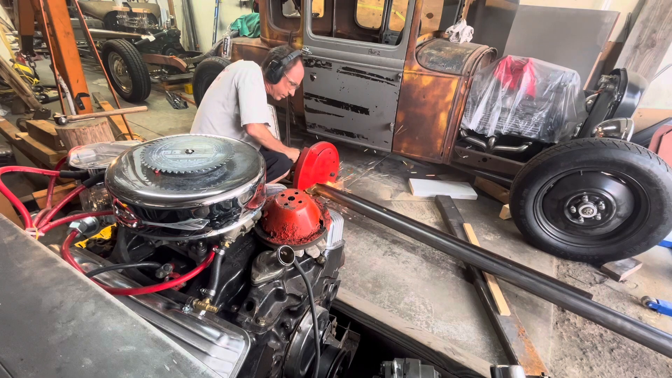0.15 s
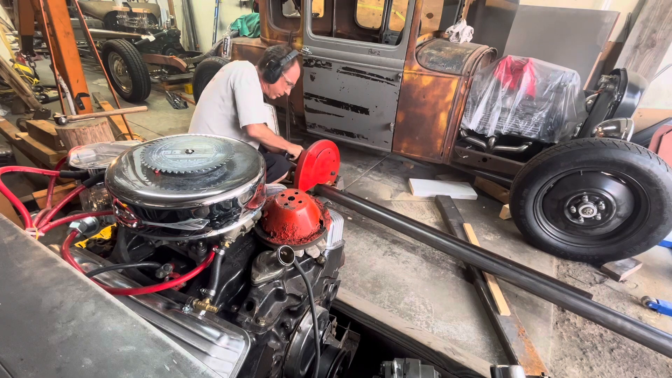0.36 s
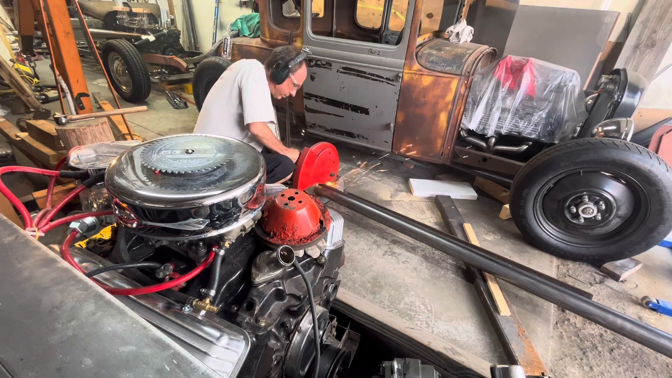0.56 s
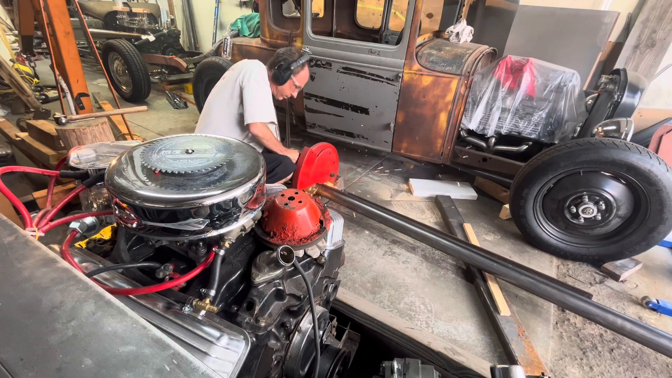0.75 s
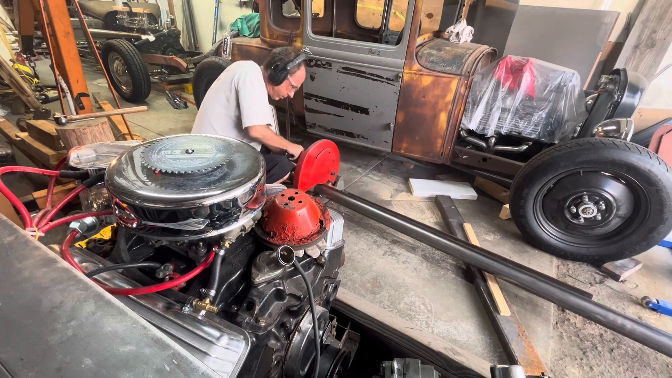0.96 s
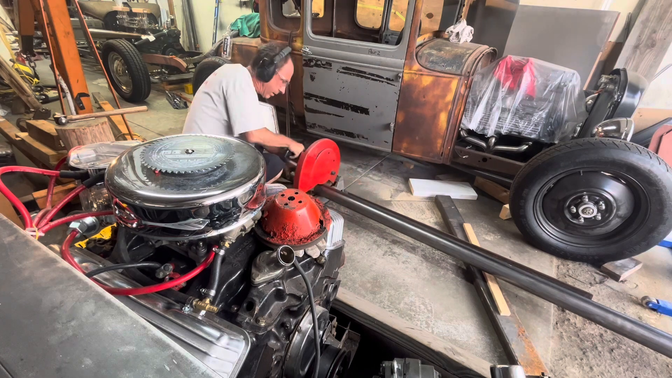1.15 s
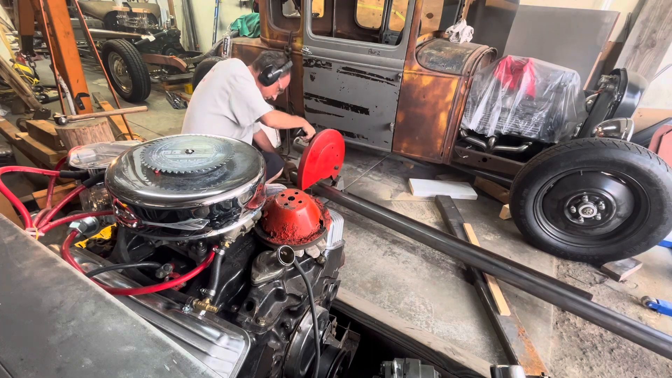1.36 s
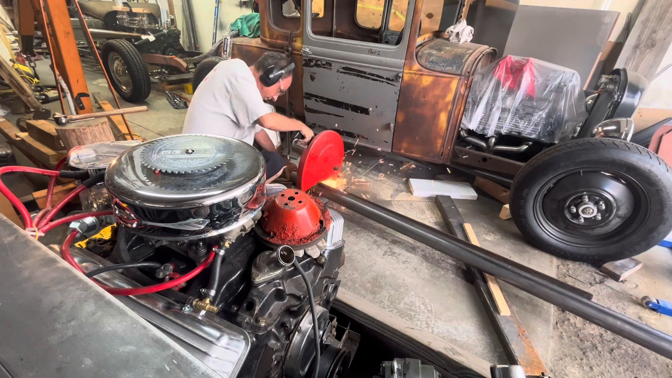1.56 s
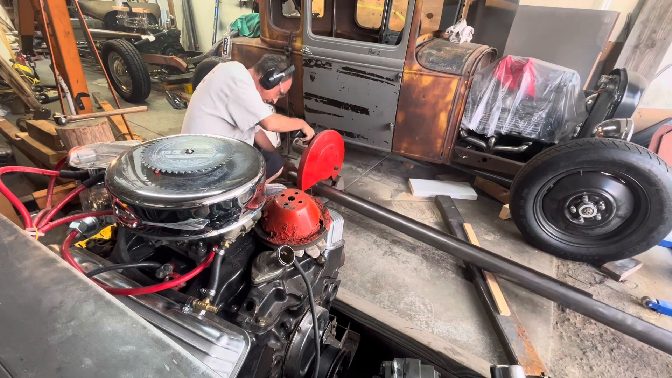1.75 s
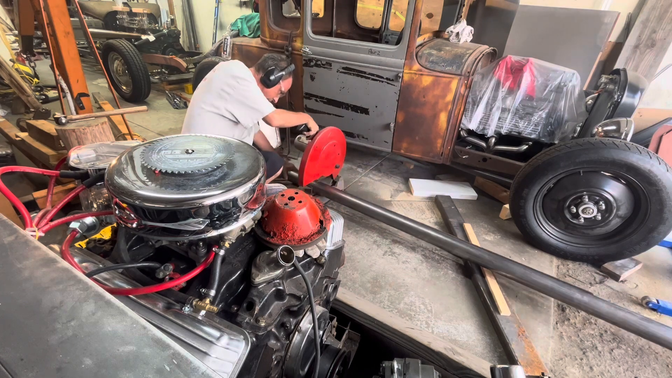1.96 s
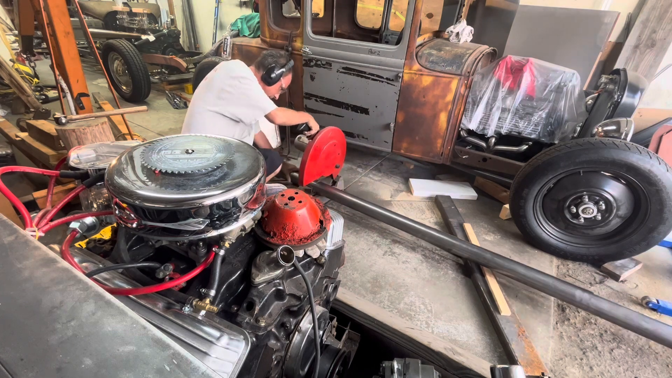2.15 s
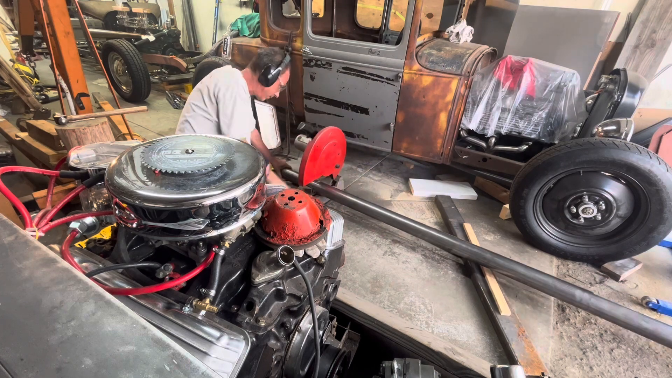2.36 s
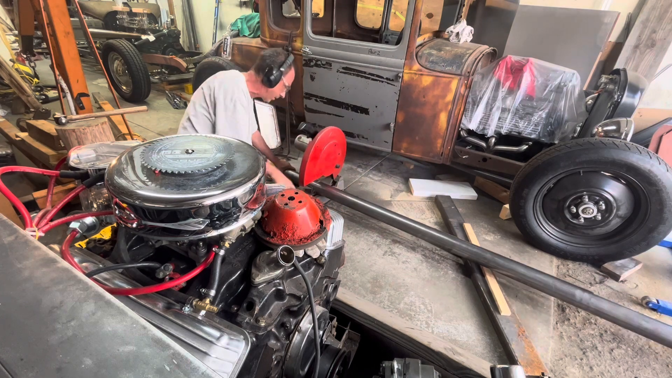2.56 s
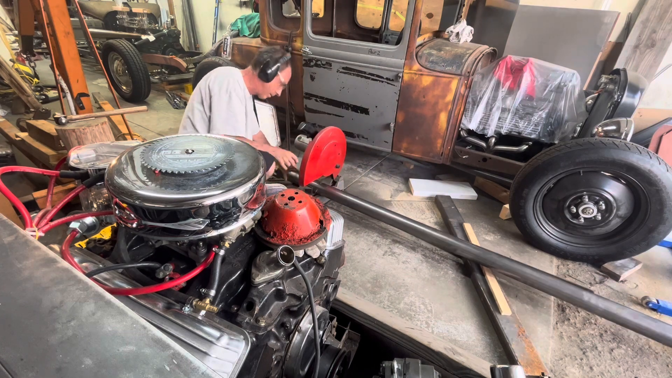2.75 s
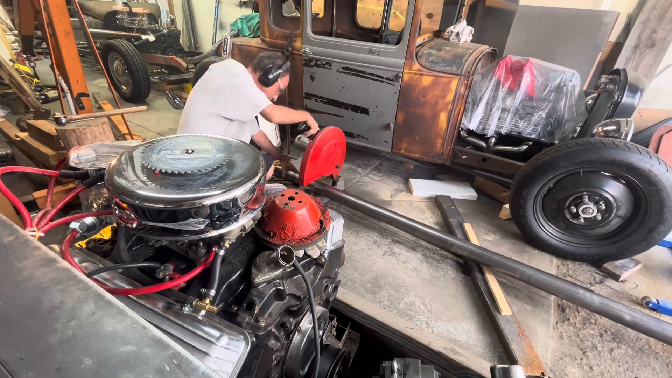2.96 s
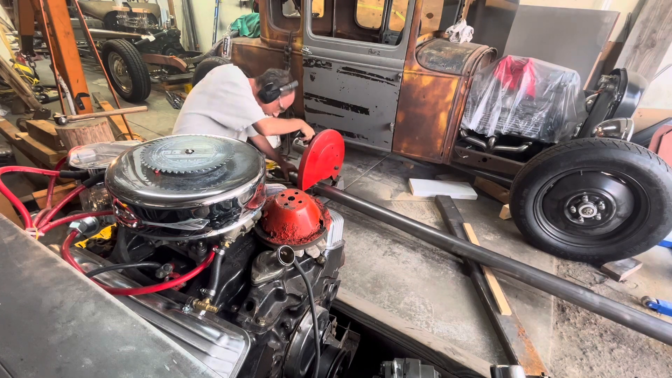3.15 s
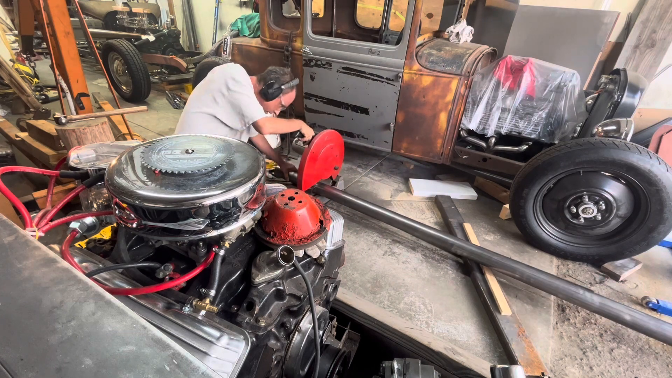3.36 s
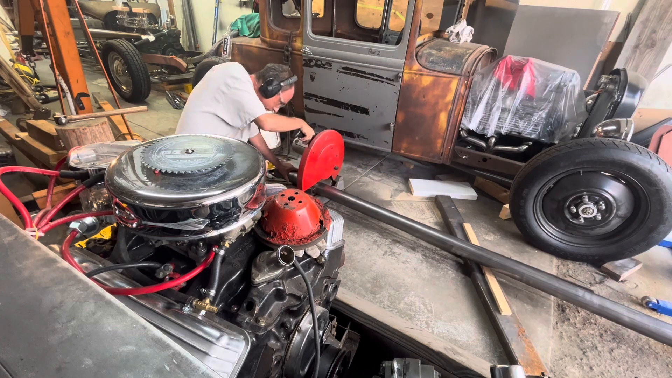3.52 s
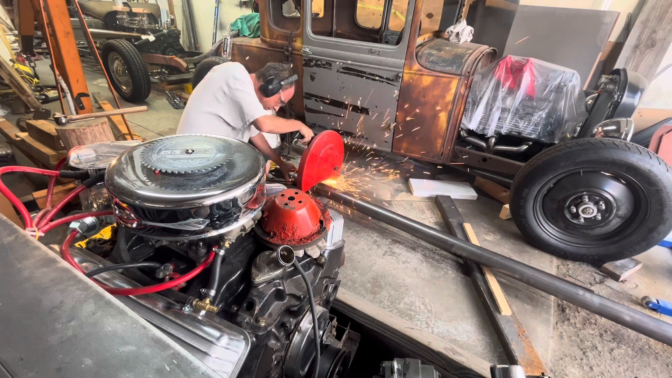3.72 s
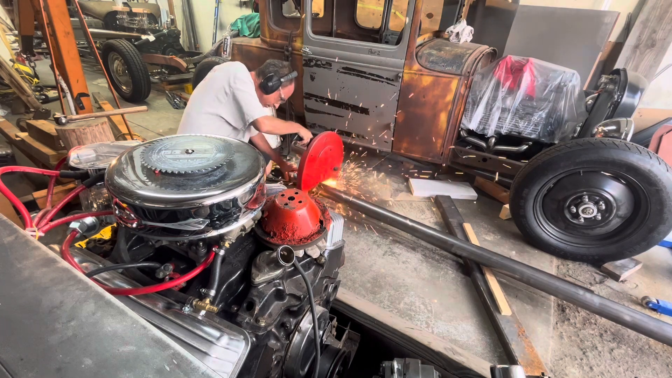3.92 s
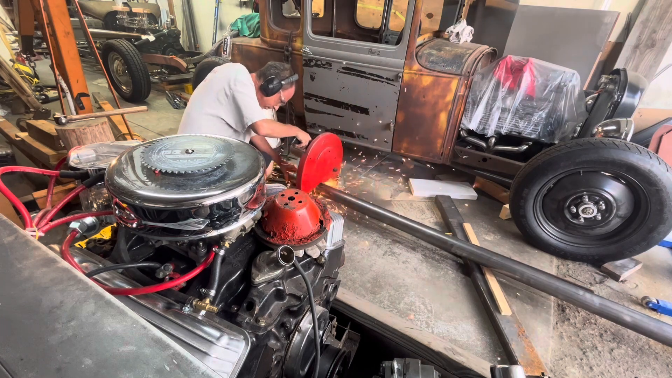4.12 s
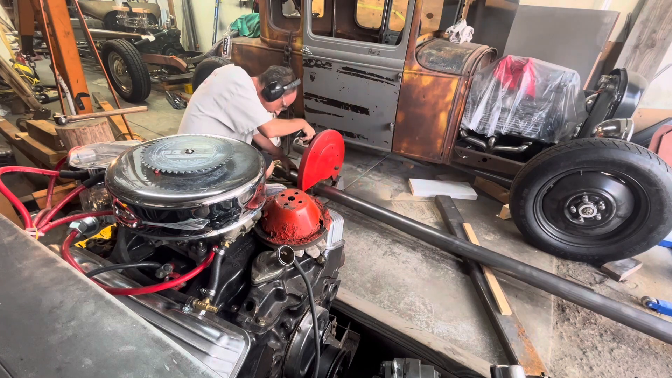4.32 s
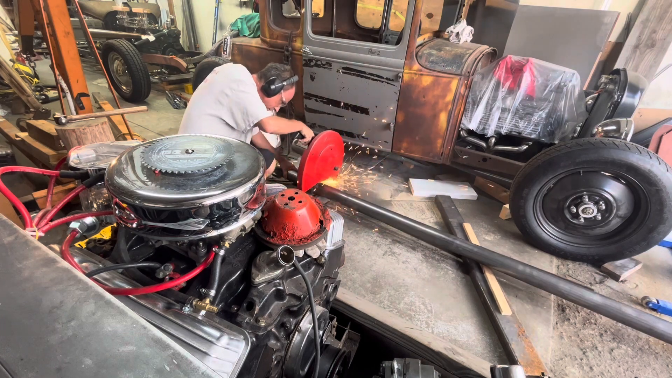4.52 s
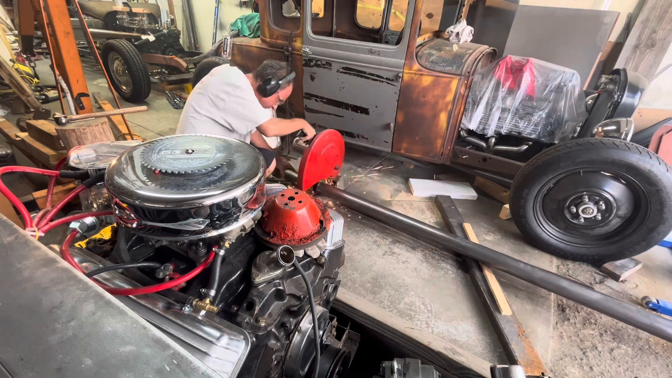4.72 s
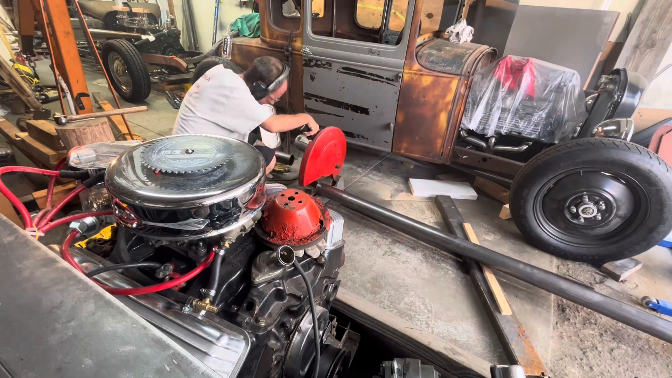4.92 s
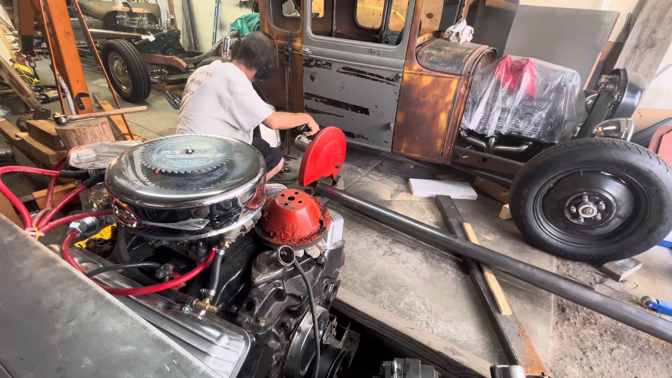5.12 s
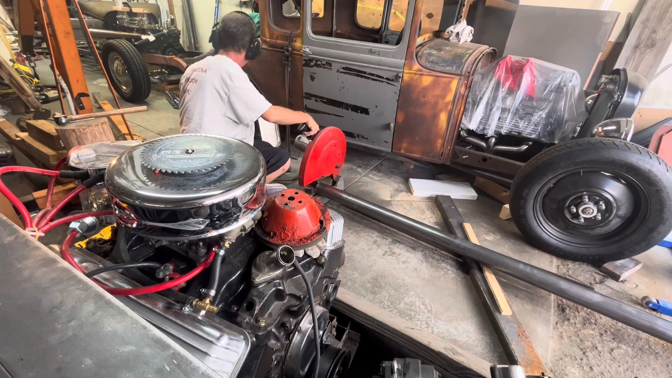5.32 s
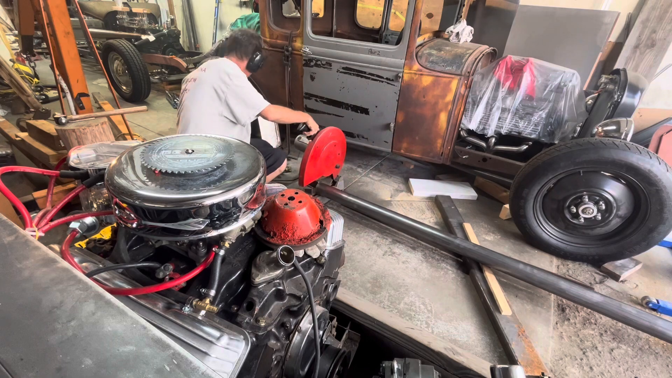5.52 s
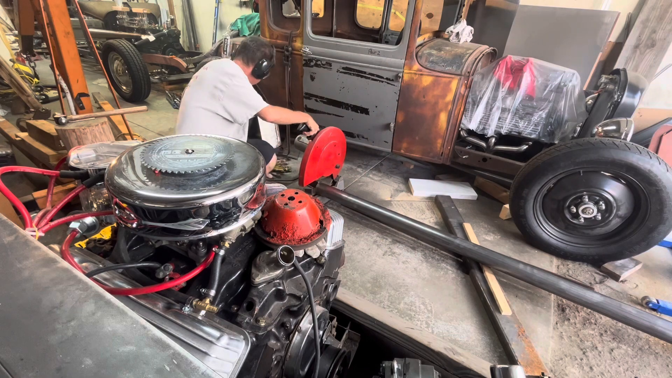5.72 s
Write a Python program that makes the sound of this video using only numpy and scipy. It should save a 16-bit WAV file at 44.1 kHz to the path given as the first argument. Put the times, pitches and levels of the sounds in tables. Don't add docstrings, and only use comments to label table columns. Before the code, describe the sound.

An abrasive chop saw works on a steel tube a few metres away in a cluttered garage, heard in stereo with a short room answer and soft air with a faint insect band. From 0 to 1.1 s gritty rasping, bright and uneven, shakes the saw's base, with the wheel singing near 4 kHz. The tube rings thinly, near 1.4 kHz, in the gap. Short bites come at 1.4 to 1.65 s, with a sharp burst around 1.83 s. The motor then coasts down to about 2.6 s, humming and fading. Quiet scuffs of hands and work follow from 2.7 to 3.55 s. At 3.6 s the wheel slams in, the loudest knock, bouncing into harsh grinding until 4.2 s. The motor whine falls briefly, another cut rasps from 4.48 to 4.77 s, and the motor winds down with a dropping whine. At 5.53 s a loose clamp clinks with a rustle and weak rebound.

```python
import sys
import numpy as np
from scipy import signal
from scipy.fft import rfft, irfft, next_fast_len
from scipy.io import wavfile
from scipy.ndimage import uniform_filter1d, map_coordinates

SR = 44100
rng = np.random.default_rng(int(sys.argv[2]) if len(sys.argv) > 2 else 0)


def voltage_ratio(decibels):
    exponent = np.asarray(decibels, float) / 20
    return 10 ** exponent


def transcribe(signal):
    frames = np.atleast_2d(signal).T
    limited = np.clip(frames, -1, 1)
    pcm = np.round(limited * 32767).astype(np.int16)
    wavfile.write(sys.argv[1], SR, pcm)


N = 254877


def along(points, hz):
    f, v = np.transpose(points)
    return np.interp(np.log(hz + 1), np.log(f + 1), v)


def curves(rows):
    return np.interp(np.arange(N) / SR, *np.transpose(rows))


def wobble(rate):
    coarse = np.arange(0, N + 32, 32)
    knots = rng.standard_normal(int(N * rate / SR) + 5)
    return np.interp(np.arange(N), coarse, map_coordinates(knots, [coarse * rate / SR]))


def strokes(s, length, first_db, last_db, rise, fall):
    coarse = np.arange(0, N + 32, 32)
    t = coarse / SR - np.asarray(s)[..., None]
    length = np.maximum(length, 1e-3)
    first_db, last_db, length = (np.asarray(v)[..., None] for v in (first_db, last_db, length))
    held = first_db + (last_db - first_db) * np.clip(t / length, 0, 1)
    db = held + rise * np.minimum(t, 0) - fall * np.maximum(t - length, 0)
    return np.interp(np.arange(N), coarse, voltage_ratio(np.atleast_2d(db).max(0)))


def filtered(x, response):
    m = next_fast_len(N + SR // 2)
    return irfft(rfft(x, m) * response(np.fft.rfftfreq(m, 1 / SR)), m)[..., :N]


def modes(table):
    def response(f):
        total = 0
        for k, (c, w, db) in enumerate(table):
            total = total + (-1) ** k * voltage_ratio(db) * 1j * f * w / (c * c - f * f + 1j * f * w)
        return total
    return response


def voiced(x, response, lo_hz, hi_hz):
    m = next_fast_len(N + SR // 4)
    hz = np.fft.rfftfreq(m, 1 / SR)
    z = rfft(x, m) * response(hz)
    band = (hz > lo_hz) & (hz < hi_hz)
    power = 2 * np.sum(abs(z.mean(0)[band]) ** 2) / (m * N)
    return irfft(z, m)[:, :N] / np.sqrt(power)


def grit(spiky_db, patchy_db, size=(5, 9)):
    # f/Hz, left-right correlation [-1..1]
    alike = [(30, 0.75), (100, 0.93), (200, 0.33), (500, -0.17), (1500, 0.024), (8000, 0.013),
             (13000, 0.27)]
    white = rng.standard_normal((2, N)) * voltage_ratio(spiky_db * rng.exponential(size=N))
    hz, _, z = signal.stft(white, SR, nperseg=512)
    field = uniform_filter1d(rng.standard_normal(z.shape[1:]), size[0], 0)
    field = uniform_filter1d(field, size[1], 1)
    turn = np.arccos(np.clip(along(alike, hz), -1, 1))[:, None] / 2
    mid, side = z[0] * np.cos(turn), z[1] * np.sin(turn)
    patches = voltage_ratio(patchy_db * field / field.std())
    return signal.istft(np.array([mid + side, mid - side]) * patches, nperseg=512)[1][:, :N]


def yard():
    # t/s, level/dB
    air_level = [
        (0, -66),
        (1.1, -64),
        (1.4, -68.5),
        (2.2, -69.5),
        (2.9, -64),
        (3.55, -61),
        (4.4, -76),
        (5.78, -67),
    ]
    # f/Hz, level/dB per Hz
    air_colour = [(15, -42.5), (25, -33), (119, -4.5), (188, -7.5), (349, -1), (614, -7), (1080, -14),
                  (1340, -11), (2920, -24.5), (5140, -14), (6920, -33), (12200, -38), (15500, -47.5)]
    air = voiced(grit(0, 2), lambda f: voltage_ratio(along(air_colour, f)), 25, 15500)
    return voltage_ratio(curves(air_level) + 1.2 * wobble(7)) * air


def hands():
    # t/s, peak level/dB, low part over it/dB, length/s
    scuffs = [(2.7204, -27.5, -19.5, 0.051), (2.758, -39, -36, 0.031), (2.856, -35, -12, 0.049),
              (2.941, -45, -6.5, 0.017), (3.043, -50.5, -3.5, 0.033), (3.089, -50, 0, 0.024),
              (3.2, -37, -13, 0.017), (3.296, -52.5, 1, 0.024), (3.4193, -25.5, -19, 0.026),
              (3.434, -43, -2.5, 0.064), (3.554, -28.5, -21, 0.0045), (5.027, -44.5, -8, 0.03),
              (5.39, -48, -12, 0.021), (5.534, -19, -20.5, 0.031), (5.584, -23.5, -18, 0.025)]
    # f/Hz, level/dB per Hz
    rustle_colour = [(410, -34), (700, -2), (1850, -1), (3190, -12), (4030, -4.5), (4350, -11),
                     (12300, -21.5), (15500, -42)]
    t, bright, dull = np.arange(N) / SR, 0, 0
    for s, db, low_db, length in scuffs:
        u = np.clip(t - s + 0.0036, 0, 1) / max(length, .004)
        swell = (1 - np.exp(-u * 4)) * np.exp(-u * u * 0.87)
        bright = bright + voltage_ratio(db - 20.0) * swell
        dull = dull + voltage_ratio(db + low_db - 8) * swell
    rustle = voiced(grit(1.3, 0.34), lambda f: voltage_ratio(along(rustle_colour, f)), 630, 12000)
    thud = voiced(grit(0, 2.4), modes([(136, 15, 3.5), (260, 95, -7), (467, 320, -3.5)]), 100, 780)
    return bright * rustle + dull * thud


def clamp():
    # t/s, strength/dB
    contacts = [
        (5.533, -32.5),
        (5.585, -47.5),
        (5.612, -64),
    ]
    # f/Hz, level/dB, t60/s
    clamp_modes = [(270, -13, .12), (1394, -2, .45), (1403, -8, .6), (1943, 11.5, .115), (2450, -20, .08),
                   (3268, -7, .13), (3478, -3, .12), (3887, -1, .14), (4124, -9, .15), (4597, -7, .12),
                   (5410, -19, .12), (5679, -14, .15), (6778, -23, .15), (8172, -25, .15)]
    out, t = np.zeros((2, N + SR)), np.arange(SR // 2) / SR
    first = contacts[0][0]
    phase = np.array([[0], [np.pi / 3]])
    for hz, level, t60 in clamp_modes:
        swell = 0
        for s, db in contacts:
            u = np.clip(t - s + first, 0, 1)
            build_up = 1 - np.exp(-(u / .022) ** 1.6)
            swell = swell + voltage_ratio(db + rng.normal(0, 1.5) - 60 * u / t60) * build_up * voltage_ratio(1 / t60)
        rattle = voltage_ratio(level + 1.2 * wobble(81)[:len(t)])
        out[:, round(first * SR):][:, :len(t)] += rattle * swell * np.sin(2 * np.pi * hz * t + phase)
    return out[:, :N]


def garage(x):
    # f/Hz, t60/s
    room_decay = [(200, .3), (2000, .22), (10000, .12)]
    hz, t, z = signal.stft(rng.standard_normal((2, SR // 2)), SR, nperseg=256)
    tail = signal.istft(z * voltage_ratio(-60 * t / along(room_decay, hz)[:, None]), SR, nperseg=256)[1]
    return signal.fftconvolve(x, tail / np.linalg.norm(tail[0]), axes=1)[:, :N]


def motor():
    # t/s, length/s, fan air level at the start/dB, at the end/dB, housing hum over it/dB
    coast = [
        (1.94, .62, -57, -66.5, 3.5),
        (2.598, 0.15, -76.5, -76, 13.5),
        (4.211, 0.26, -46, -61.5, -4),
        (4.814, 0.17, -51, -58, -5.5),
        (5.01, .76, -57.5, -58.5, -3),
        (5.302, .23, -67, -64, 9.5),
    ]
    # t/s, length/s, first pitch f/Hz, level/dB
    whine = [
        (1.68, .12, 2400, -60),
        (4.24, .22, 2550, -59),
        (4.86, .36, 2065, -63.5),
        (5.2, .32, 2400, -68),
    ]
    # f/Hz, width/Hz, level/dB
    housing = [(440.4, 11, -5), (771, 21.5, -2)]
    # f/Hz, level/dB per Hz
    fan_colour = [(35, -54), (60, -53.5), (132, -15.5), (312, -17), (443, -1.5), (627, -24), (773, -9.5),
                  (889, -6), (2980, -13.5), (4220, -8), (12000, -24), (15500, -37.5)]
    spin_db_s, stop_db_s, sag_hz_s = 395, 115, 1965
    s, length, first_db, last_db, hum_db = np.transpose(coast)
    hum = voltage_ratio(1.5 * wobble(18) - 1.5) * voiced(grit(0, 1.2), modes(housing), 700, 860)
    air = voltage_ratio(.8 * wobble(9)) * voiced(grit(1, 1.6), lambda f: voltage_ratio(along(fan_colour, f)), 2500, 9000)
    out = hum * strokes(s, length, first_db + hum_db, last_db + hum_db, spin_db_s, stop_db_s)
    out = out + air * strokes(s, length, first_db, last_db, spin_db_s, stop_db_s)
    t, flutter = np.arange(N) / SR, 1 + 0.004 * wobble(60)
    beats = voltage_ratio(2.5 * np.array([wobble(12), wobble(12)]) - 3)
    for s, length, hz, db in whine:
        pitch = np.clip(hz - sag_hz_s * (t - s), 0, 2 * hz) * flutter
        turns = np.cumsum(pitch) / SR
        tone = 0
        for k, partial_db in [(1, 5.5), (2, -1.5)]:
            tone = tone + voltage_ratio(partial_db) * np.sin(2 * np.pi * (k * turns + [[0], [.25]]))
        out = out + strokes(s, length, db, db, spin_db_s, spin_db_s) * beats * tone
    return out


def tube():
    # f/Hz, phase wander/rad, level/dB
    partials = [(1392, .8, 0), (3905, 1.5, -20)]
    # t/s, level/dB, decay/dB per s
    rings = [
        (0.0, -38, 100),
        (1.11, -51.5, 71),
        (1.21, -56.5, 124),
        (1.3, -68, 50),
        (1.652, -45.5, 68.5),
        (1.95, -47, 126),
        (2.77, -60, 110),
        (4.2, -48.5, 200),
        (4.326, -59, 195),
        (4.74, -61.5, 49),
    ]
    t, ring = np.arange(N) / SR, 0
    for hz, wander, db in partials:
        drift = wander * np.array([wobble(10), wobble(10)])
        ring = ring + voltage_ratio(db) * np.sin(2 * np.pi * hz * t + drift)
    plucks = np.max([strokes(s, 0, db, db, 393, decay) for s, db, decay in rings], axis=0)
    return plucks * voltage_ratio(6.5 + 1.2 * wobble(20)) * ring


def flares():
    # t/s, length/s, f/Hz, level/dB
    flare_tones = [(0.051, 0.39, 7570, -42), (0.359, 0.072, 2800, -46.5), (0.723, .16, 1392, -41.5),
                   (1.258, 0.1, 2925, -71), (1.711, .04, 2925, -50), (1.712, .035, 3900, -43),
                   (1.47, 0.16, 7430, -42.5), (1.829, 0.023, 1770, -32), (1.828, 0.052, 3390, -32),
                   (3.64, 0.16, 5180, -36), (3.741, 0.091, 5510, -30.5), (3.712, 0.1, 11885, -32),
                   (3.798, 0.12, 1880, -38), (3.81, 0.1, 2912, -34.5), (3.838, 0.23, 7425, -36),
                   (3.962, .04, 2912, -35), (4.02, 0.046, 2510, -34), (4.16, 0.042, 6400, -39)]
    out, unsteady = np.zeros((2, N)), np.array([wobble(45), wobble(45)])
    for s, length, hz, db in flare_tones:
        part = slice(round(s * SR), round((s + length) * SR))
        t = np.arange(part.stop - part.start) / SR
        swell = np.sqrt(np.sin(np.pi * t / (length + .001)))
        out[:, part] += voltage_ratio(db + 4) * swell * np.sin(2 * np.pi * hz * t + 2.2 * unsteady[:, part])
    return out * voltage_ratio(3 * unsteady[::-1])


def bites():
    # t/s, peak level/dB, pitch f/Hz
    slams = [
        (1.43, -33, 760),
        (3.5955, -3, 780),
        (3.622, -9, 820),
        (3.658, -13, 770),
        (4.478, -52, 900),
    ]
    out, t = np.zeros((2, N + SR)), np.arange(SR // 2) / SR
    for s, db, hz in slams:
        swell = np.exp(-((t - .003) / 0.0012) ** 2)
        out[:, round((s - .003) * SR):][:, :len(t)] += voltage_ratio(db - 3.7) * swell * np.sin(2 * np.pi * hz * t)
    return out[:, :N]


def cutting():
    # t/s, length/s, rasp level at the start/dB, at the end/dB, shake of the base/dB
    pushes = [(0.0, .49, -34, -38, -36.5), (0.506, 0.13, -49.5, -44, -44.5),
              (0.644, .295, -34.5, -42, -36.5), (0.941, .15, -43.5, -40.5, -34),
              (1.248, 0.0093, -50, -50.5, -44.5), (1.423, .05, -45.5, -51, -31),
              (1.479, 0.023, -30.5, -30.5, -33), (1.515, .12, -34.5, -31, -32),
              (1.656, 0.051, -40, -55, -46.5), (1.725, 0.0087, -34.5, -41, -49),
              (1.767, 0.025, -60, -44.5, -53), (1.824, .025, -28.5, -26.5, -40),
              (1.848, 0.084, -27, -35.5, -40.5), (3.591, 0.044, -32.5, -24, -21),
              (3.654, 0.17, -25, -28.5, -36), (3.796, 0.4, -30.5, -34, -35),
              (4.314, 0.0066, -43.5, -47, -47.5), (4.479, .035, -28, -40, -39),
              (4.511, 0.17, -36, -34, -34), (4.702, .07, -40.5, -47, -45), (4.772, 0.0071, -41.5, -40, -54)]
    # t/s, length/s, level/dB
    songs = [
        (0.076, 0.29, -38.5),
        (1.472, .05, -41),
        (1.728, 0.005, -32.5),
        (1.839, 0.029, -25),
        (3.627, .17, -26),
        (3.847, .14, -33),
        (4.006, 0.183, -28),
        (4.6, 0.059, -35),
    ]
    # f/Hz, level/dB per Hz
    rasp_colour = [(40, -34.5), (100, -30.5), (350, -12.5), (1000, -3.5), (2500, 0.5), (4500, 1.5),
                   (7000, -2), (12500, -4), (14000, -12.5), (14700, -34.5)]
    # f/Hz, width/Hz, level/dB
    steel_modes = [(1392, 30, 8.5), (1770, 220, 1.5), (1880, 11, 5), (2510, 17, 2.5), (2912, 13, 8.5),
                   (3560, 28, -2.5), (3540, 17, -11.5), (5180, 15, -1.5), (5510, 30, -0.5), (7000, 12, -15),
                   (7425, 43, 4.5), (8420, 70, 2), (9720, 49, 0), (11885, 43, -16.5), (12400, 15, -6),
                   (13240, 13.4, 4.5)]
    # f/Hz, width/Hz, level/dB
    base_modes = [(138.1, 7.8, -10.5), (267.3, 51, -13), (363.3, 15.4, -1.5), (438, 24.4, 2.5),
                  (587, 64, -4), (672, 60, -1.5), (760.6, 46, 3), (922, 161, 1), (955, 26, -0.5),
                  (1048, 30, -5), (1203, 780, -12.5)]
    # f/Hz, width/Hz, level/dB
    wheel_modes = [(3910, 24, -3), (4060, 18, 0), (4200, 40, -12), (4450, 45, -12), (4300, 2500, -24)]
    bite_db_s, lift_db_s, base_lift_db_s = 1400, 593, 417.5
    s, length, first_db, last_db, base_db = np.transpose(pushes)
    push = strokes(s, length, first_db, last_db, bite_db_s, lift_db_s)
    jolt = strokes(3.592, 0, -19, -19, bite_db_s, 102)
    shake = np.maximum(strokes(s, length, base_db, base_db, bite_db_s, base_lift_db_s), jolt)
    s, length, db = np.transpose(songs)
    sing = np.maximum(voltage_ratio(-7) * push, strokes(s, length, db, db, lift_db_s, lift_db_s))
    chatter = 0.094 * wobble(32)
    rasp = voltage_ratio(chatter - 1) * voiced(grit(1.3, 1.5), lambda f: voltage_ratio(along(rasp_colour, f)), 5000, 14000)
    walls = voltage_ratio(-4) * voiced(grit(0, 5, size=(2, 14)), modes(steel_modes), 1300, 14000)
    base = voiced(grit(1.5, 2.2, size=(2, 12)), modes(base_modes), 300, 1150)
    base = voltage_ratio(chatter + 1.2 * wobble(35) - 1) * base
    song = voltage_ratio(0.79 * wobble(25)) * voiced(grit(0, 1.1, size=(2, 14)), modes(wheel_modes), 2900, 7200)
    return push * (rasp + walls) + shake * base + sing * song


def scene():
    hits = clamp() + bites()
    room = voltage_ratio(-17) * garage(hits)
    return yard() + hands() + room + motor() + tube() + flares() + hits + cutting()


def band_limit(x):
    return signal.sosfilt(signal.butter(12, 15710, fs=SR, output="sos"), x)


def record(dry):
    # f/Hz, left over right level/dB
    lean = [(60, -7.5), (200, 0.5), (700, -0.5), (1400, 2.5), (2400, 0), (4400, 7), (7500, 3.5),
            (12000, -1)]
    ceiling, top_hz = .8, 15200
    rounded = dry / (1 + abs(dry / ceiling) ** 4) ** .25
    sides = np.array([[.5], [-.5]])
    leaning = filtered(rounded, lambda hz: voltage_ratio(sides * along(lean, hz)) * (hz < top_hz))
    return band_limit(leaning)


dry = scene()
out = record(dry)
transcribe(out)
```